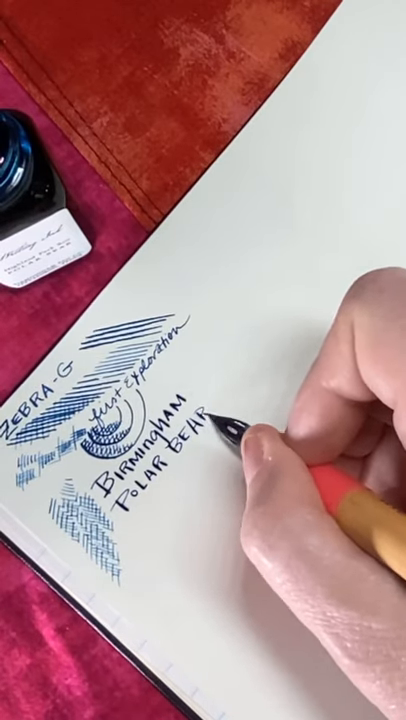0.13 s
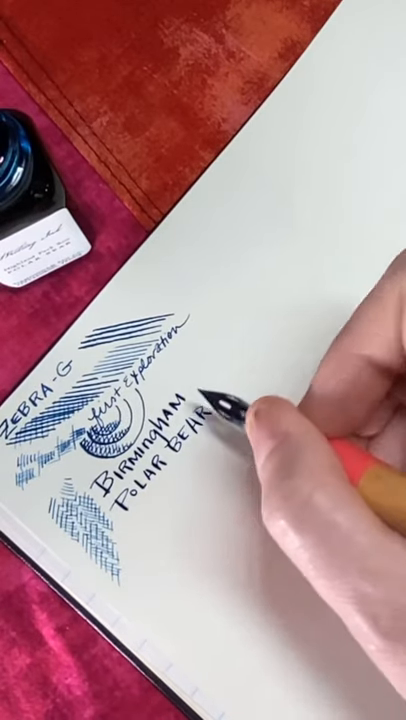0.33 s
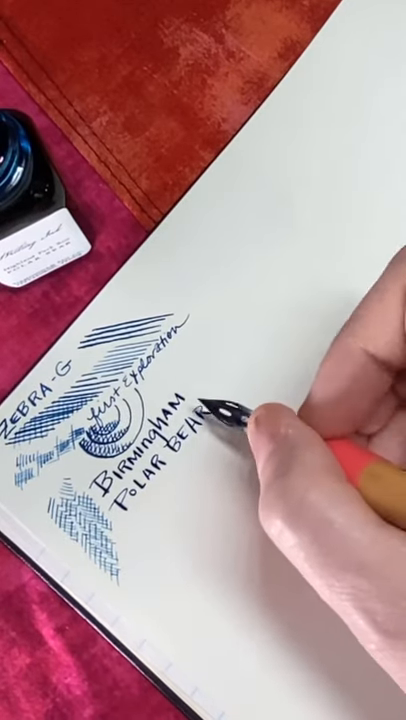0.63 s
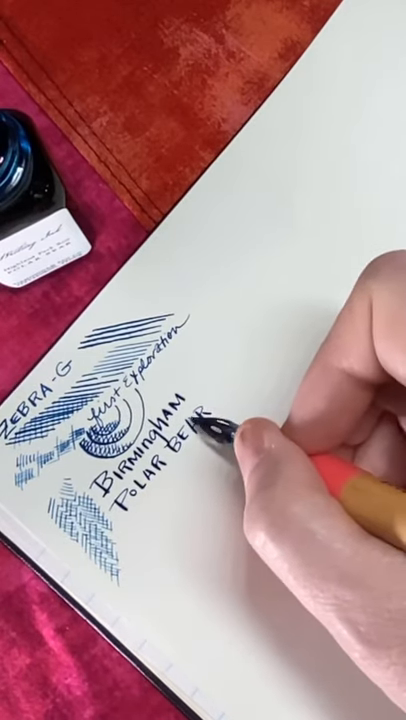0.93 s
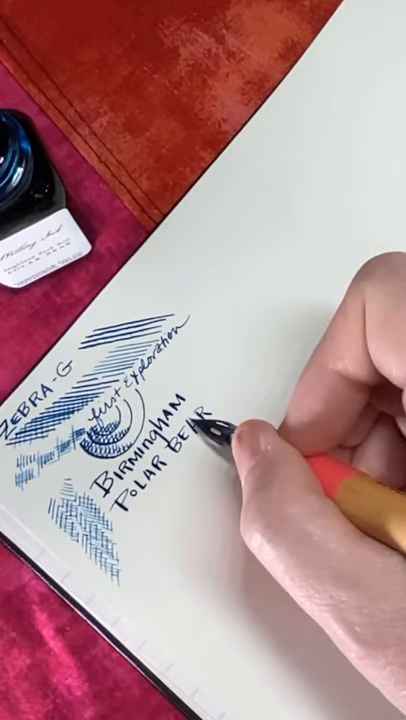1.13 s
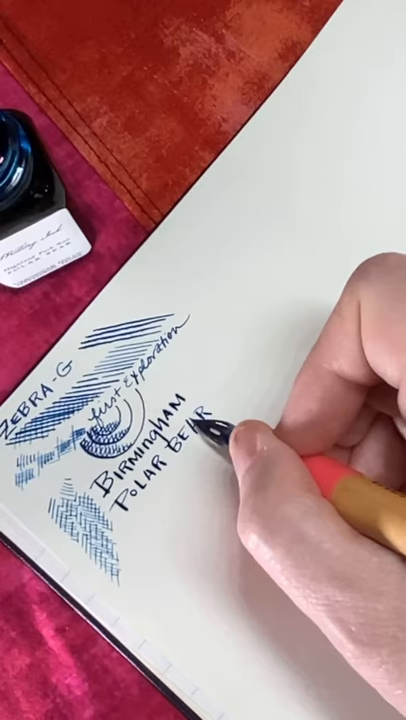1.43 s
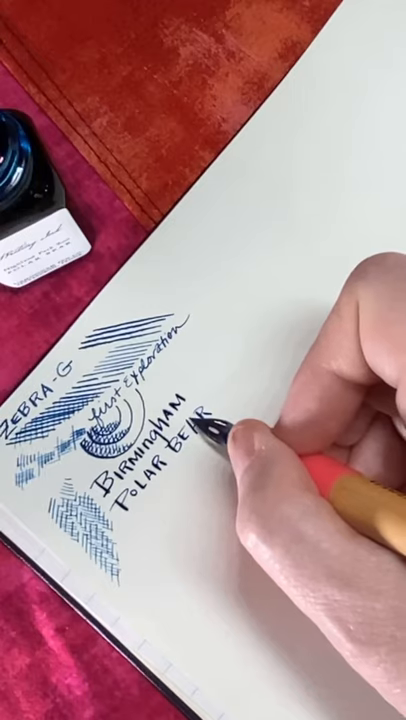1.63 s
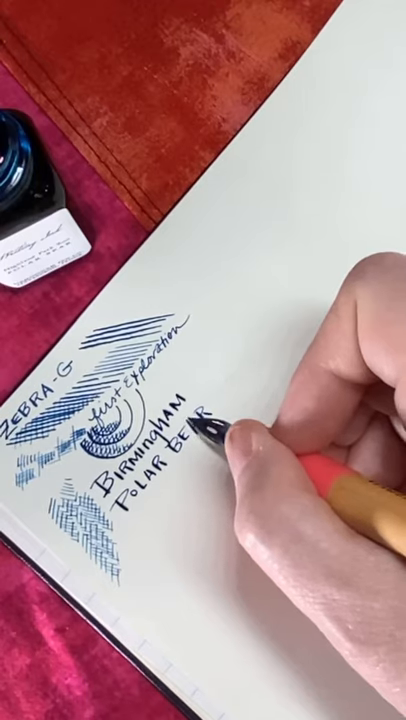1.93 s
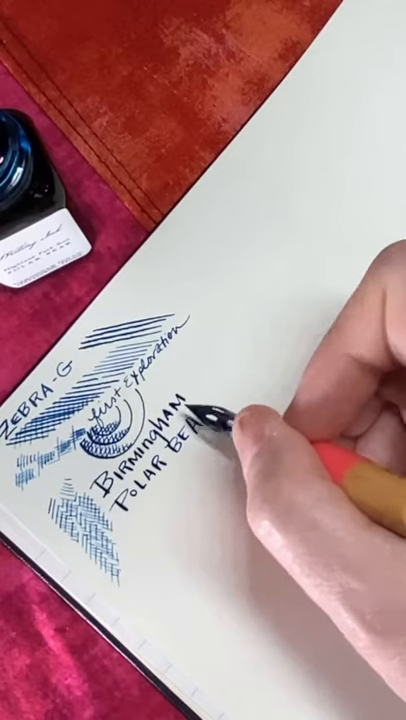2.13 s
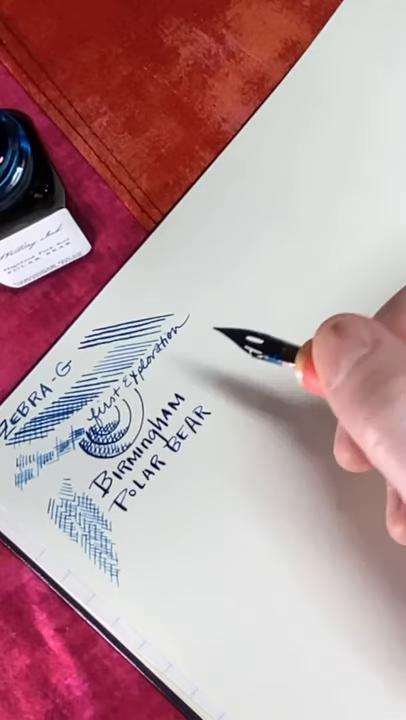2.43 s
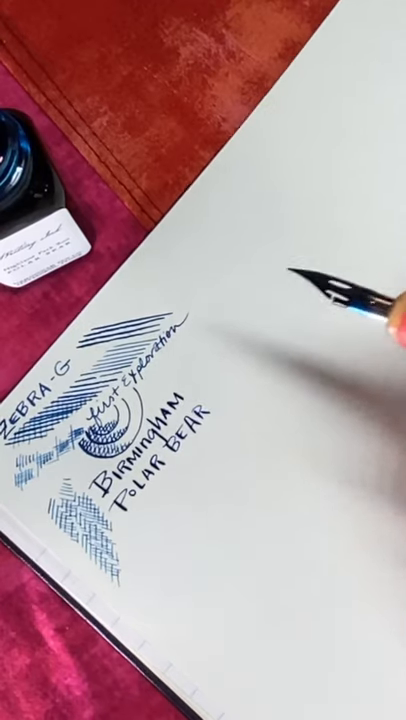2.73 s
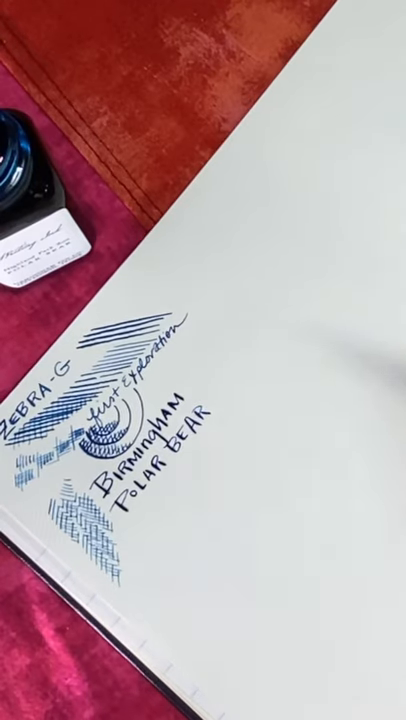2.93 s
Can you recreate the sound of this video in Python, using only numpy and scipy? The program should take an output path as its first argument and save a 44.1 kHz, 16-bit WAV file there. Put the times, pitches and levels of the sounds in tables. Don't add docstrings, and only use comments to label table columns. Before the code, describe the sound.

A steel dip nib scratches paper in short faint drags, ticks and crisp flicks, with soft hand thuds on the desk; finally the wooden holder rattles on a glass bottle. Close stereo microphone, small quiet room, low hum.

```python
import sys
import numpy as np
from scipy import signal
from scipy.fft import rfft, irfft
from scipy.io import wavfile
from scipy.ndimage import uniform_filter1d

SR = 44100
rng = np.random.default_rng(int(sys.argv[2]) if len(sys.argv) > 2 else 0)


def bounce(signal):
    frames = np.transpose(np.atleast_2d(signal))
    limited = np.clip(frames, -1, 1)
    pcm = np.round(limited * 32767).astype(np.int16)
    wavfile.write(sys.argv[1], SR, pcm)


def level_to_linear(level):
    exponent = np.asarray(level, float) / 20
    return 10 ** exponent


N = 136269
HISS_TOP_HZ = 13650
# (frequency [Hz], left minus right [dB])
LEAN = [(60, -2), (350, -4.5), (900, 0), (2500, 1.5), (6000, 3.5)]


def at_hz(points, hz):
    table_hz, values = np.transpose(points)
    return np.interp(np.log(hz + 1), np.log(table_hz), values)


def rms_one(x):
    return x / np.sqrt(np.mean(x ** 2) + 1e-20)


def ring(x, hz, t60):
    r, w = level_to_linear(-60 / (t60 * SR)), 2 * np.pi * hz / SR
    return signal.lfilter([0, np.sin(w)], [1, -2 * r * np.cos(w), r * r], x + 1e-18)


def bloom(x, hz, t60):
    build_cycles = 2.6
    quick = build_cycles / hz
    return ring(ring(x, hz, quick), hz, t60) * 2 * np.log(1000) / (quick * SR)


def peaks(x, table):
    out = 0
    for k, (hz, width, db) in enumerate(table):
        r = np.exp(-np.pi * width / SR)
        poles = [1, -2 * r * np.cos(2 * np.pi * hz / SR), r * r]
        out = out + (-1) ** k * level_to_linear(db) * signal.lfilter([1 - r * r, 0, r * r - 1], poles, x + 1e-18)
    return out


def swell(start, attack, hold, release):
    t = np.arange(N) / SR - start
    return np.clip(t / attack, 0, 1) * np.exp(-np.clip(t - attack - hold, 0, 1) / release)


def soft_clicks(times, gains, width_s):
    x = np.zeros(N)
    x[(np.array(times) * SR).astype(int)] = gains
    r = np.exp(-1 / (width_s * SR))
    return signal.lfilter([(1 - r) ** 2], [1, -2 * r, r * r], x + 1e-18)


def fibres():
    fine = rms_one(uniform_filter1d(rng.standard_normal(N), size=40))
    coarse = rms_one(uniform_filter1d(rng.standard_normal(N), size=250))
    return rms_one(rng.standard_normal(N) * level_to_linear(2.5 * fine + 2.7 * coarse))


def air():
    # (frequency [Hz], level [dB per Hz])
    spectrum_db = [(25, -19), (55, -4.5), (160, -5), (290, -13.5), (380, -25.5), (850, -28.5), (1500, -39),
                   (14000, -57)]
    # (frequency [Hz], likeness [0-1])
    coherence = [(60, 0.73), (150, 0.95), (300, 0.55), (640, 0.38), (2000, 0), (6000, 0.7)]
    # (time [s], level [dB])
    hum_levels = [(0.0, -60), (0.05, -47), (0.83, -56.5), (0.89, -45.5), (0.95, -76), (1.01, -46.5),
                  (1.83, -63), (1.95, -45), (2.0, -68), (2.06, -48), (2.5, -54), (2.53, -65), (2.67, -42.5),
                  (2.87, -65.5), (3.04, -57), (3.09, -59)]
    air_db, hum_db, whine_db = -53, -1, -78.5
    hum_hz, hum_width_hz, whine_hz, whine_width_hz = 79.5, 3.64, 801, 12
    hz = np.fft.rfftfreq(N, 1 / SR)
    alike = np.clip(at_hz(coherence, hz), 0, 1)
    mid, side = rfft(rng.standard_normal((2, N)))
    pair = np.sqrt(1 + alike) * mid + np.sqrt(1 - alike) * side * [[1], [-1]]
    pair = pair * level_to_linear(at_hz(LEAN, hz) * [[.4], [-.4]] + at_hz(spectrum_db, hz)) * (hz < HISS_TOP_HZ)
    hum = irfft(mid / (1 + ((hz - hum_hz) / hum_width_hz) ** 2), N)
    hum = hum / np.sqrt(uniform_filter1d(hum ** 2, size=2500) + .1 * np.mean(hum ** 2))
    swell_db = np.interp(np.arange(N) / SR, *np.transpose(hum_levels))
    whine = irfft(pair / (1 + ((hz - whine_hz) / whine_width_hz) ** 2), N)
    hiss = level_to_linear(air_db) * rms_one(irfft(pair, N))
    return hiss + level_to_linear(hum_db + swell_db) * hum + level_to_linear(whine_db) * rms_one(whine)


def sleeve():
    # (frequency [Hz], level [dB per Hz])
    cloth = [(300, -4), (700, -12), (2000, -7), (6000, -8), (15000, -13)]
    start_s, attack_s, hold_s, fade_s, level_db = 2.635, 0.011, 0.22, 0.19, -58
    hz = np.fft.rfftfreq(N, 1 / SR)
    wash = irfft(rfft(rng.standard_normal((2, N))) * level_to_linear(at_hz(cloth, hz)) * (hz > 250), N)
    return level_to_linear(level_db) * swell(start_s, attack_s, hold_s, fade_s) * rms_one(wash)


def bumps():
    # (time [s], level [dB], frequency [Hz], t60 [s])
    thuds = [
        (0.557, -39.5, 186, 0.1),
        (.571, -35.5, 190, 0.16),
        (0.987, -29.5, 234, 0.035),
        (1.002, -31, 143, 0.062),
        (1.019, -36, 102, 0.12),
    ]
    return sum(ring(soft_clicks([s], level_to_linear(db), 0.00015), hz, t60) for s, db, hz, t60 in thuds)


def drags():
    # (time [s], length [s], level [dB], centre [Hz])
    broad_drags = [(0, 0.058, -57, 2100), (0, 0.013, -55, 9400), (.1305, 0.00089, -62.5, 8700),
                   (.15, 0.011, -89, 11000), (0.143, .015, -59, 1670), (0.344, 0.065, -70, 2840),
                   (.344, .002, -64, 6000), (.348, .002, -57, 2800), (.362, .003, -59, 3500),
                   (.348, .002, -59, 10000), (0.548, 0.035, -61.5, 2700), (.553, 0.025, -83, 9000),
                   (0.553, 0.04, -59, 500), (0.951, .05, -70.5, 1220), (0.975, 0.03, -59.5, 450),
                   (1.294, 0.13, -67.5, 700), (1.297, 0.04, -65, 2850), (1.39, .03, -65, 1220),
                   (1.372, 0.023, -72, 5300), (1.463, 0.055, -63, 700), (1.466, 0.019, -77, 2500),
                   (1.611, 0.021, -67.5, 1030), (1.865, 0.05, -71, 3000), (1.868, 0.043, -77, 700),
                   (2.122, 0.019, -76, 4040), (2.118, 0.062, -66.5, 700), (3.021, 0.037, -72, 5200),
                   (2.414, 0.55, -87, 3770), (0.346, 0.021, -64.5, 13200), (1.385, .015, -80, 9000),
                   (2.725, .03, -65, 600), (2.88, .07, -70, 550), (2.83, .04, -66, 600)]
    # (time [s], length [s], level [dB], centre [Hz])
    chirrs = [(.008, 0.01, -66, 2400), (.008, .02, -66, 1800), (.004, .02, -68, 6300),
              (.152, 0.011, -72, 1800), (.373, 0.012, -60, 3520), (.385, .01, -70, 1590),
              (2.9, .03, -70, 4300), (.553, 0.015, -62.5, 1560), (1.152, 0.04, -81, 2130),
              (1.468, .03, -78, 2500), (1.618, 0.027, -76, 1200), (1.615, 0.0063, -75.5, 11300),
              (1.466, .025, -78.5, 5200), (2.123, 0.022, -67, 2420), (1.47, .03, -80, 11000),
              (2.12, .01, -80, 12000), (2.78, .02, -68, 2200), (1.3, .02, -68, 2650),
              (3.022, 0.032, -69.5, 2400)]
    # (frequency [Hz], width [Hz], level [dB])
    sheet = [(700, 262, -2.5), (1350, 264, 3), (1483, 640, -4), (2450, 260, -1.5), (3314, 640, -17.5),
             (4640, 133, -6), (5950, 460, -20.5)]
    sheet_db, sag_total_db, attack_s, release_s = -8, -4, 0.0025, 0.014
    size = 2 ** 15
    out, hz = np.zeros((2, N)), np.fft.rfftfreq(size, 1 / SR) + 1
    raw = np.array([fibres(), fibres()])
    grain = level_to_linear(sheet_db) * raw + peaks(raw, sheet)
    for rows, octaves in (broad_drags, 0.61), (chirrs, 0.1):
        for s, length, db, centre_hz in rows:
            start = int(np.clip((s - 1 / 20) * SR, 0, N - size))
            span = slice(start, start + size)
            skirt = level_to_linear(-6 * np.abs(np.log2(hz / centre_hz)) / octaves)
            band = irfft(rfft(grain[:, span]) * skirt, size)
            progress = np.clip((np.arange(start, start + size) / SR - s) / length, 0, 1)
            level = level_to_linear(db + 3.0 + sag_total_db * progress)
            out[:, span] += level * swell(s - .001, attack_s, length, release_s)[span] * rms_one(band)
    return out


def knocks():
    # (time [s], level [dB])
    hits = [
        (2.6359, -27),
        (2.6598, -28.5),
        (2.679, -30),
        (2.7045, -29),
        (2.8171, -26),
    ]
    # (frequency [Hz], level [dB], t60 [s])
    bottle = [(203, -7, 0.074), (342, -3.5, 0.09), (420, 0, 0.055), (483, 2.5, 0.065), (586, -5.5, 0.07),
              (676, -13, 0.06), (790, -4, 0.06), (1165, -1.5, 0.055), (2150, -4, 0.04), (2880, -5, 0.02),
              (3683, -9, 0.06), (6000, -9.5, 0.035), (7308, -12.5, 0.065), (7715, -13.5, 0.03)]
    # (frequency [Hz], level [dB], t60 [s])
    holder = [(530, -7, .05), (900, -5.5, .04), (1540, -9, .035), (1690, -18, .04), (2400, -12, .035),
              (3450, -9, .02), (3950, -10, .015), (5050, -8.5, .02), (5550, -8.5, .015), (7000, -15, .02)]
    # (frequency [Hz], width [Hz], level [dB])
    crack_body = [(450, 370, 0), (1110, 700, 1), (2400, 700, -1), (3300, 970, -1), (5340, 820, 0),
                  (5980, 700, -3), (7300, 680, -5), (11000, 7900, -18)]
    crack_db, crack_release_s, fresh_grit, late_cycles = -8.5, 0.0055, .5, 0.78
    s, db = np.transpose(hits)
    luck_db = rng.normal(0, 1, (len(s), len(bottle)))
    late_s = rng.uniform(0, 0.0012, len(bottle))
    grit = rng.standard_normal(N)
    crack = 0
    for t, hit_db in hits:
        texture = np.roll(grit, int(t * SR)) + fresh_grit * grit
        crack = crack + level_to_linear(hit_db + crack_db) * swell(t, 0.0009, 0.0012, crack_release_s) * texture
    modes = 0
    for k, (hz, level_db, t60) in enumerate(bottle):
        gains = level_to_linear(db + level_db - 8 + luck_db[:, k])
        modes = modes + bloom(soft_clicks(s + late_cycles / hz + late_s[k], gains, .00001), hz, t60)
    wood = 0
    for k, (hz, level_db, t60) in enumerate(holder):
        push = soft_clicks(s + late_cycles / hz + late_s[-k], level_to_linear(db + level_db - 8), .00001)
        wood = wood + (-1) ** k * bloom(push, hz, t60)
    return modes + wood + peaks(crack, crack_body)


def ticks():
    # (time [s], click [dB], pad thud [dB])
    touches = [
        (0.1316, -47, -63),
        (0.7335, -32, -38),
        (0.8264, -39.5, -42),
        (1.2724, -35.5, -40),
        (2.5964, -51, -90),
    ]
    # (frequency [Hz], level [dB], t60 [s])
    pad = [(190, -4, 0.14), (372.6, 6, 0.04), (660, -6.5, 0.07), (1260, 1, 0.035), (780, -9, .05)]
    # (frequency [Hz], width [Hz], level [dB])
    click_body = [(1510, 1330, 3), (2400, 800, 3.5), (5400, 2200, -14), (2850, 400, -8)]
    chatter_s, chatter, touch_s, touch, thud_delay_s = 0.00156, 0.48, .0011, .25, 0.0034
    s, click_db, thud_db = np.transpose(touches)
    click = soft_clicks(s - touch_s, touch * level_to_linear(click_db), .00002)
    for k in range(4):
        click = click + soft_clicks(s + chatter_s * k ** 1.2, level_to_linear(click_db) * (-chatter) ** k, .00002)
    click = signal.sosfilt(signal.butter(2, 8000, fs=SR, output="sos"), click)
    push = soft_clicks(s + thud_delay_s, level_to_linear(thud_db), .0001)
    return 5.5 * peaks(click, click_body) + sum(level_to_linear(db) * bloom(push, hz, t60) for hz, db, t60 in pad)


def flicks():
    # (time [s], snap [dB], second snap [dB], scrape [dB])
    strokes = [
        (0.3495, -45, -48, -44),
        (1.305, -26.5, -31, -38.5),
        (1.8698, -24, -27, -39),
        (2.899, -22.5, -25, -38),
    ]
    # (frequency [Hz], width [Hz], level [dB])
    tines = [(6300, 1500, -12), (6760, 1800, -8.5), (8050, 760, 0.5), (10720, 450, -6.5), (15700, 500, -12)]
    slip_s, slip_db, second_snap_s, snap_gap_s, stutter = .0045, -11, 0.012, 0.00055, .65
    load_s, scrape_attack_s, scrape_hold_s, scrape_release_s = 0.0099, 0.0065, 0.022, 0.016
    s, first_db, second_db, scrape_db = np.transpose(strokes)
    times = np.r_[s - slip_s, s, s + second_snap_s]
    gains = level_to_linear(np.r_[first_db + slip_db, first_db, second_db])
    snap = sum((-stutter) ** k * soft_clicks(times + snap_gap_s * k ** 0.77, gains, .00001) for k in range(5))
    force = 0
    for t, db in zip(s, scrape_db):
        force = force + level_to_linear(db) * swell(t - load_s, scrape_attack_s, scrape_hold_s, scrape_release_s)
    scrape = force * fibres()
    band = signal.butter(2, [3300, 12500], "band", fs=SR, output="sos")
    broad = signal.sosfilt(band, 0.17 * scrape + 0.07 * snap)
    return peaks(3.6 * snap + 0.2 * scrape, tines) + broad


def ports(x):
    # (frequency [Hz], left lag [rad])
    lag = [(250, 0), (1400, 1.5), (2300, 1.5), (5000, 1.27)]
    hz = np.fft.rfftfreq(N, 1 / SR)
    half = level_to_linear(at_hz(LEAN, hz) / 2) * np.exp(-.5j * at_hz(lag, hz))
    return irfft(rfft(x) * [half, 1 / half], N)


def room(x):
    t60_s, level_db, gap_s = 0.22, -8.5, 0.00373
    t = np.arange(SR // 2) / SR
    tail = rng.standard_normal((2, len(t))) * level_to_linear(-60 * t / t60_s) * (t > gap_s)
    tail /= np.sqrt(np.sum(tail ** 2) / 2)
    return level_to_linear(level_db) * signal.fftconvolve(x[None], tail, axes=1)[:, :N]


def scene():
    near, rubs = flicks() + ticks() + bumps() + knocks(), drags()
    return ports(near + 0.36 * rubs[0]) + 1.02 * rubs + room(near + rubs[0]) + sleeve() + air()


def faint_top_dropped(x):
    gate_db, window_s = -89, .012
    hz, spectrum = np.fft.rfftfreq(N, 1 / SR), rfft(x)
    top = irfft(spectrum * (hz > HISS_TOP_HZ), N)
    level = uniform_filter1d(np.mean(top ** 2, axis=0), int(window_s * SR))
    gate = uniform_filter1d(1. * (level > level_to_linear(2 * gate_db)), size=200)
    return irfft(spectrum * (hz <= HISS_TOP_HZ) + rfft(gate * top) * (hz > HISS_TOP_HZ), N)


def band_limit(x):
    return signal.sosfilt(signal.butter(12, 17060, fs=SR, output="sos"), x)


def record(dry):
    merge_hz, in_phase_hz, turn_hz, turn_dwell, top_hz = 6200, 6936, 4030, 0.1, 15750
    hz, (left, right) = np.fft.rfftfreq(N, 1 / SR), rfft(dry)
    top = np.clip((hz - merge_hz) / 300 + .5, 0, 1)
    phase = 2 * np.pi * (hz - in_phase_hz) / turn_hz
    turn = np.exp(.5j * (phase - turn_dwell * np.sin(2 * phase)))
    cut = level_to_linear(-np.clip((hz - top_hz) / 8, 0, 30))
    merged = [(1 - top) * left + top * left / turn, (1 - top) * right + top * left * turn]
    mix = faint_top_dropped(irfft(cut * merged, N))
    return band_limit(mix)


dry = scene()
out = record(dry)
bounce(out)
```